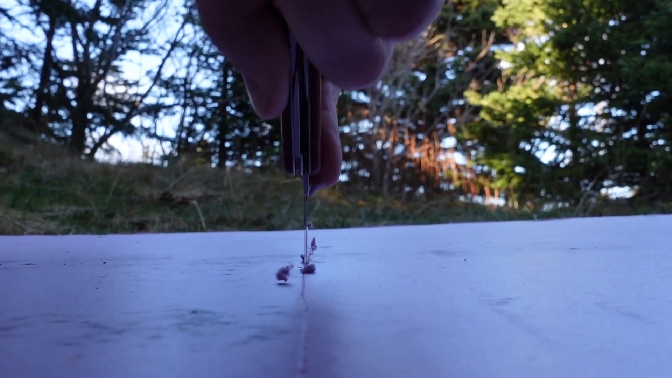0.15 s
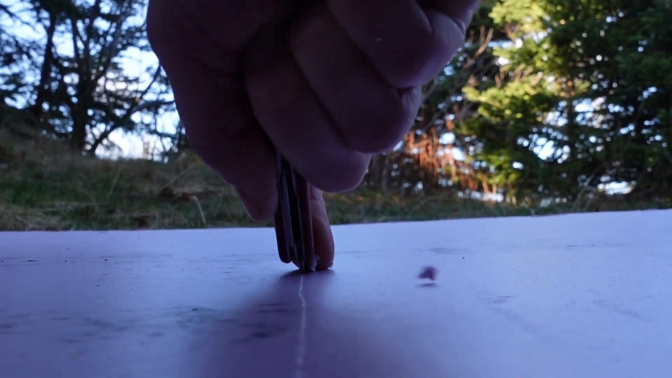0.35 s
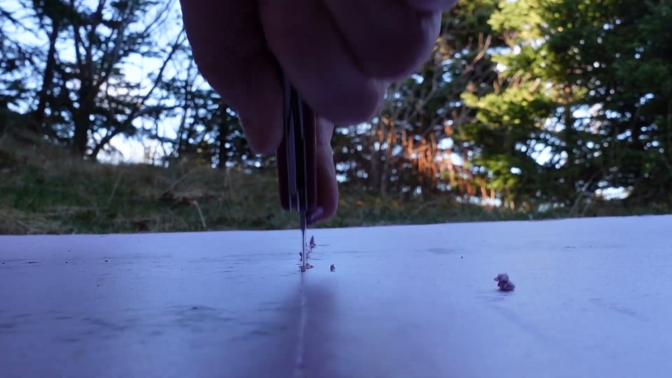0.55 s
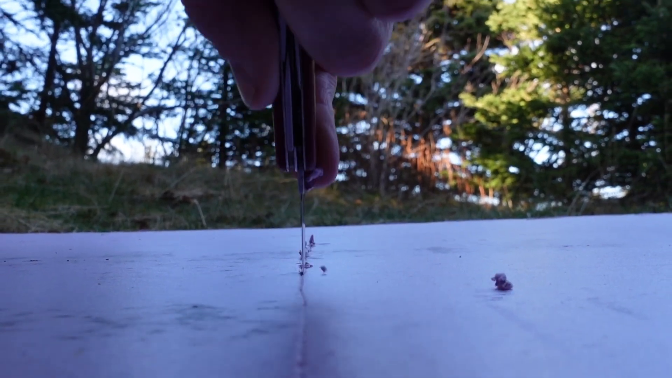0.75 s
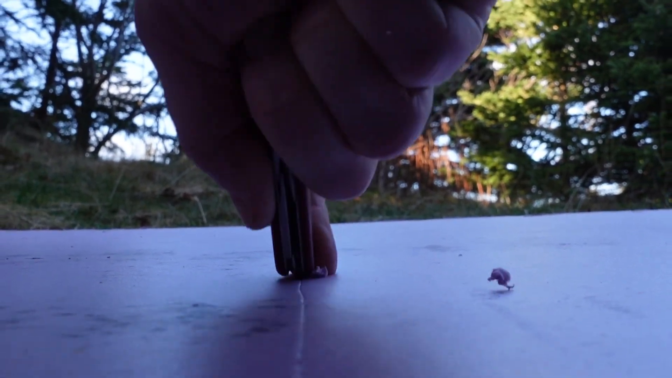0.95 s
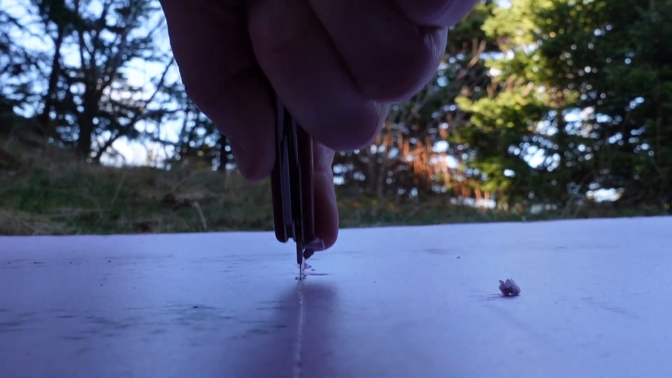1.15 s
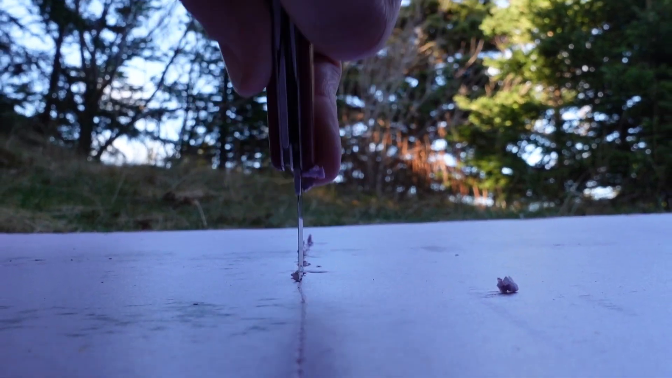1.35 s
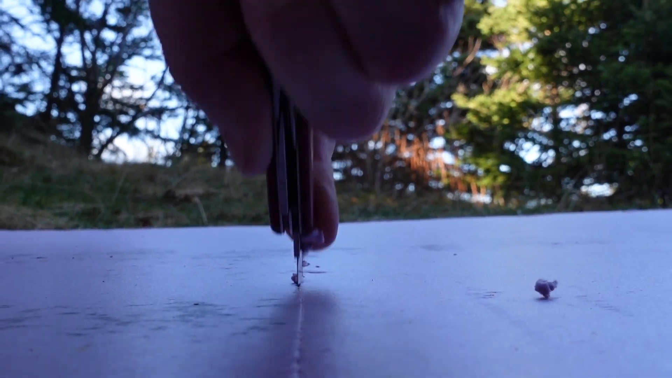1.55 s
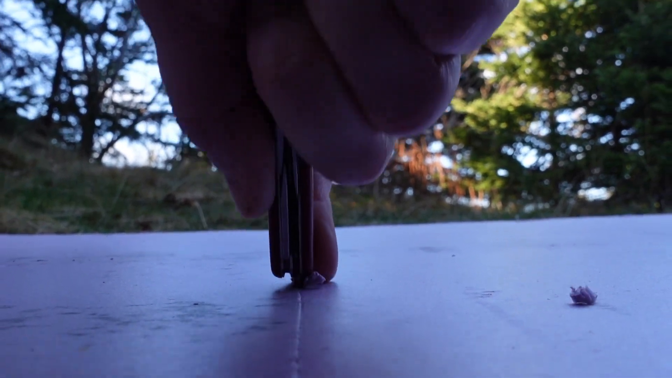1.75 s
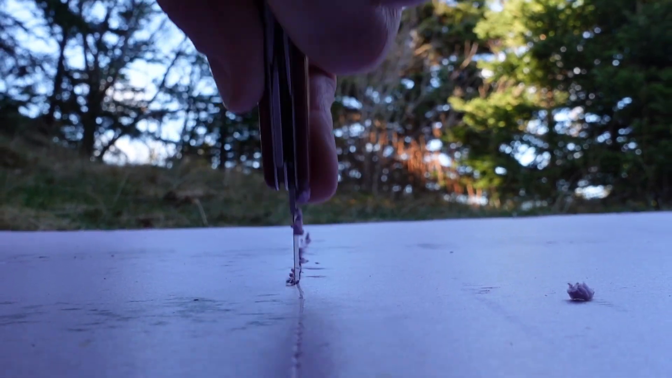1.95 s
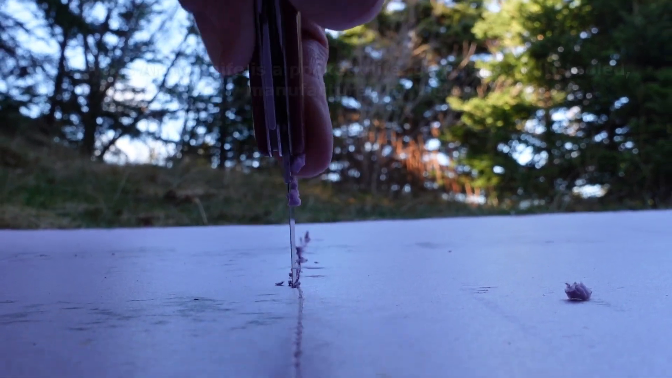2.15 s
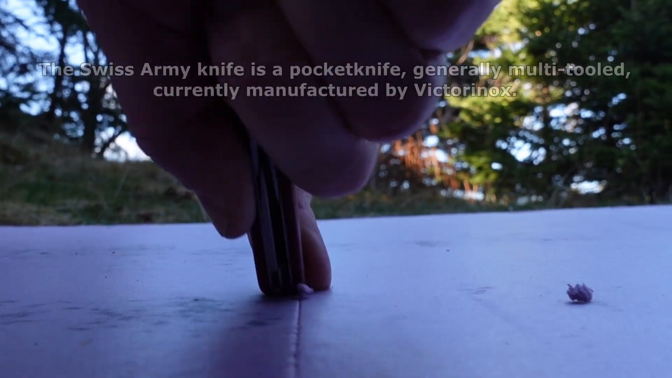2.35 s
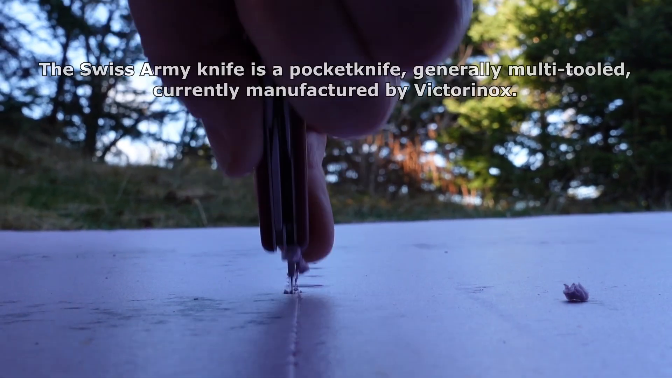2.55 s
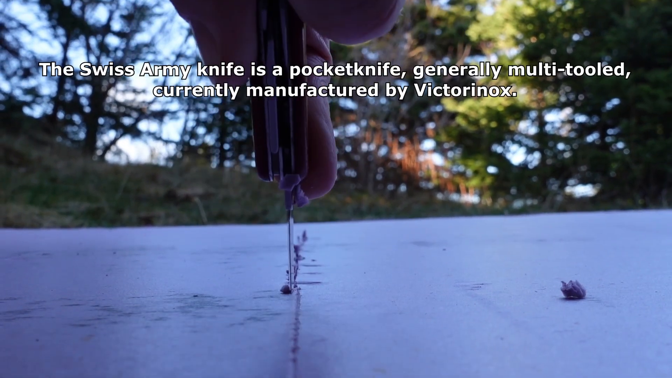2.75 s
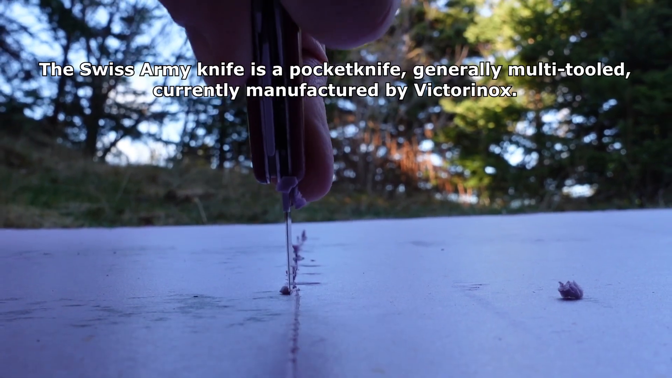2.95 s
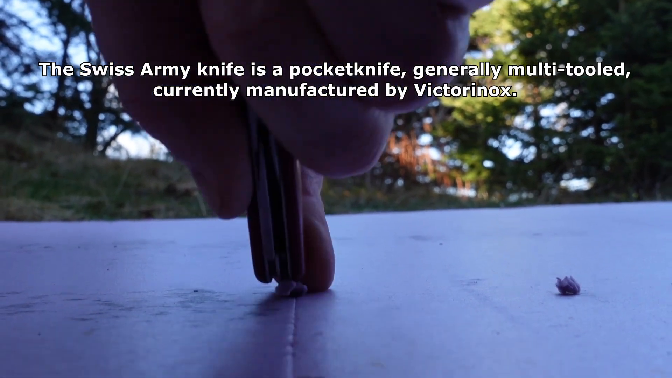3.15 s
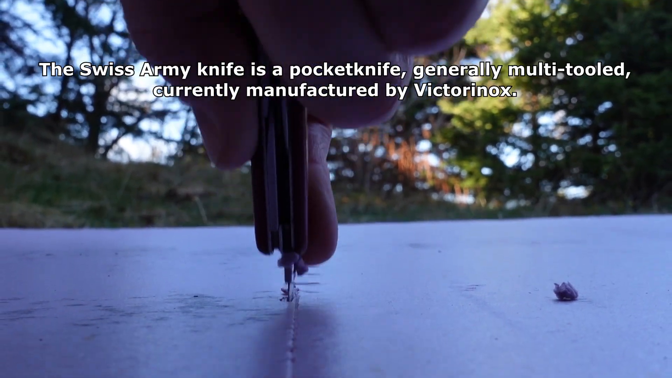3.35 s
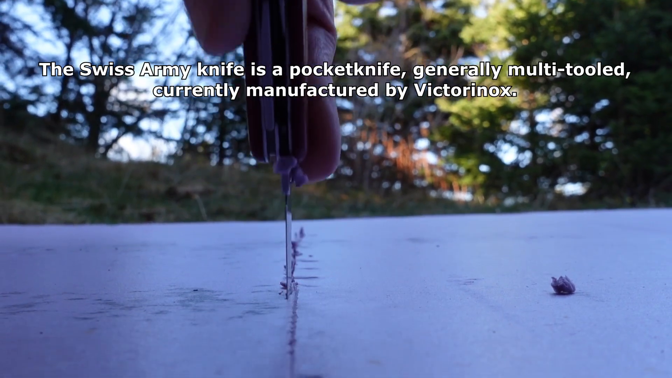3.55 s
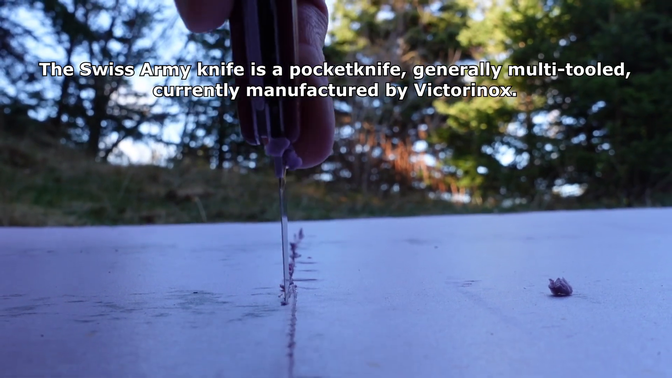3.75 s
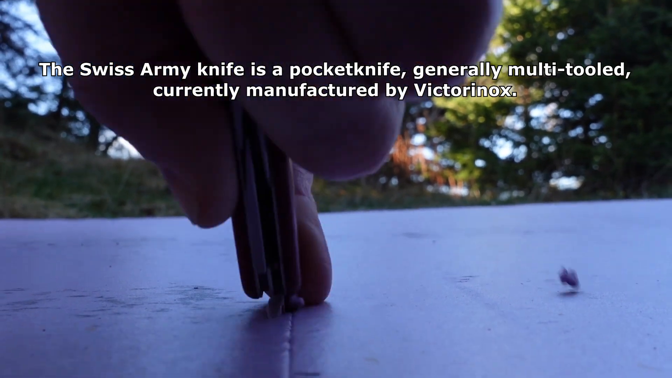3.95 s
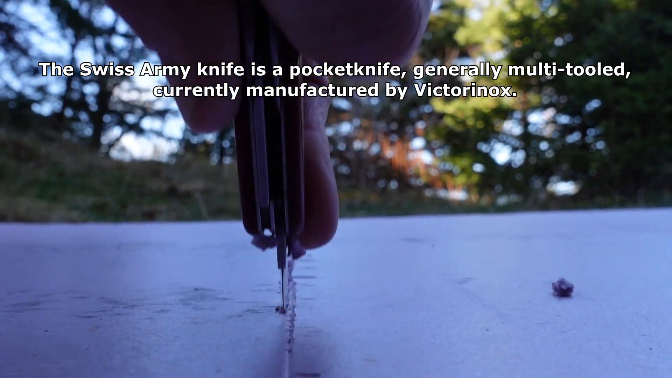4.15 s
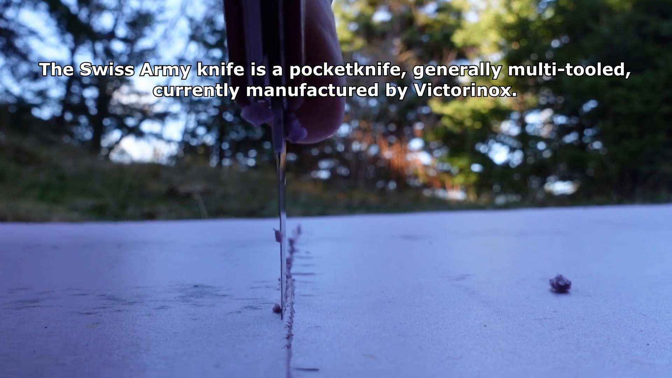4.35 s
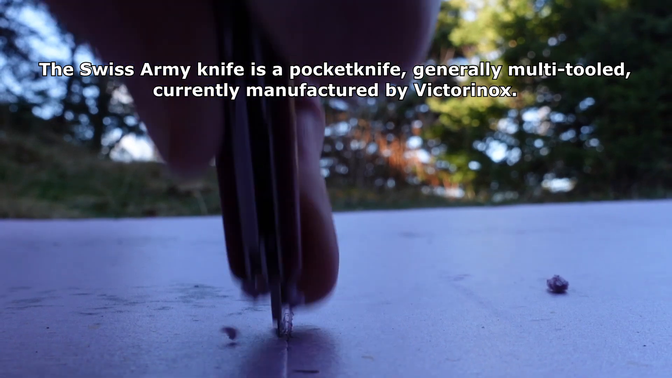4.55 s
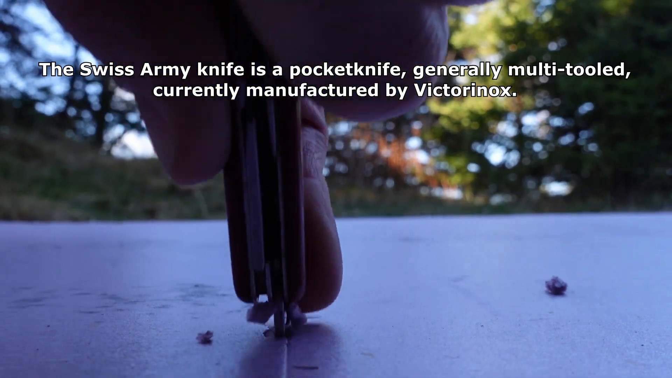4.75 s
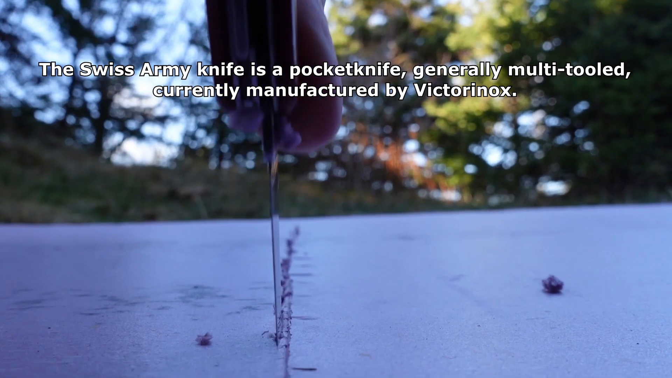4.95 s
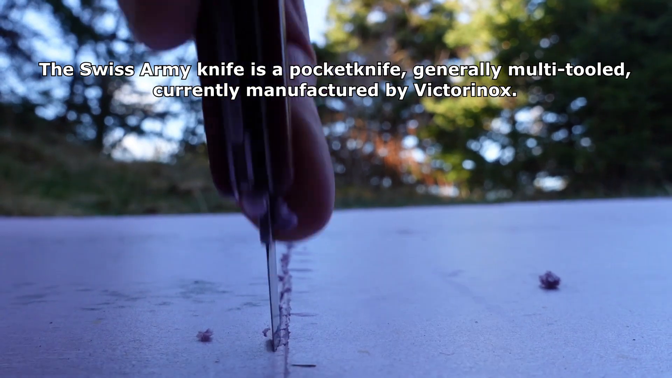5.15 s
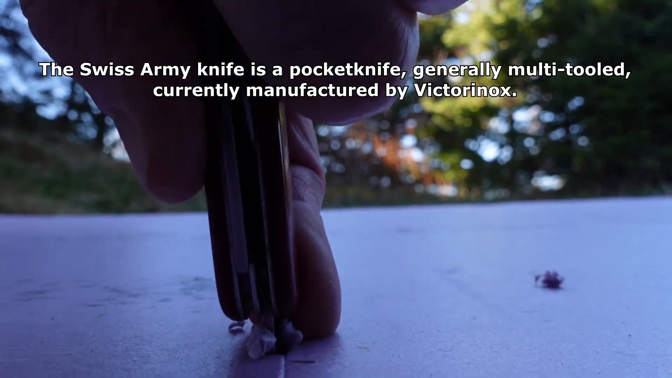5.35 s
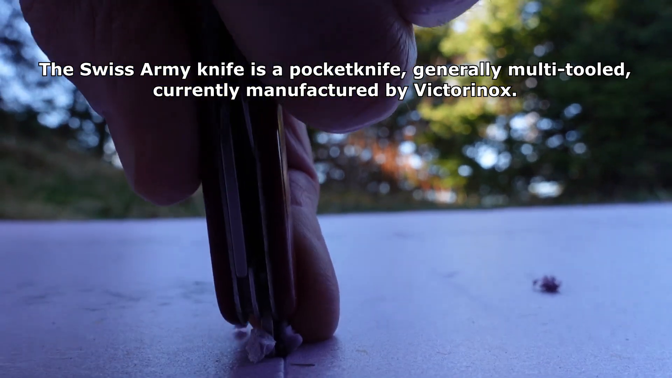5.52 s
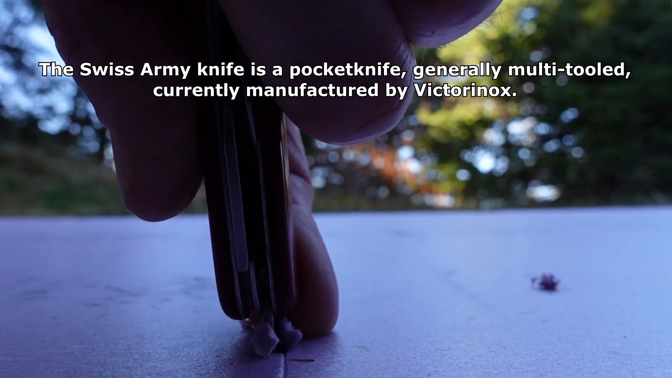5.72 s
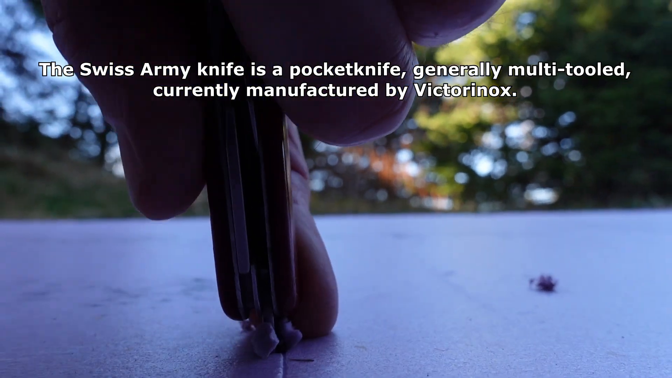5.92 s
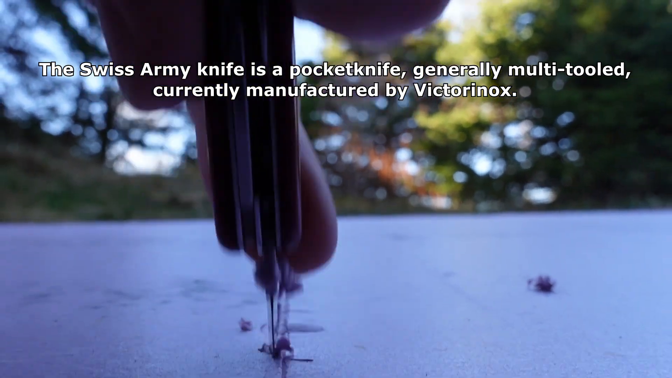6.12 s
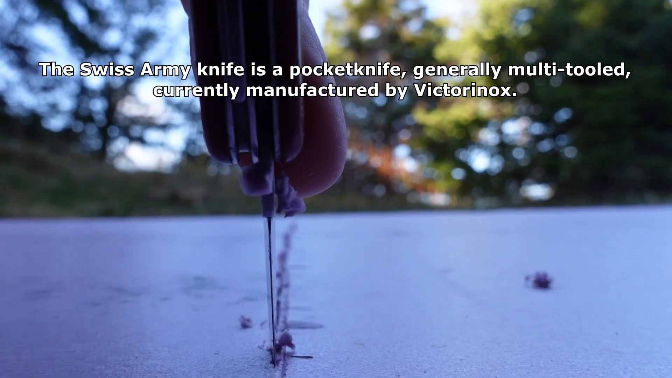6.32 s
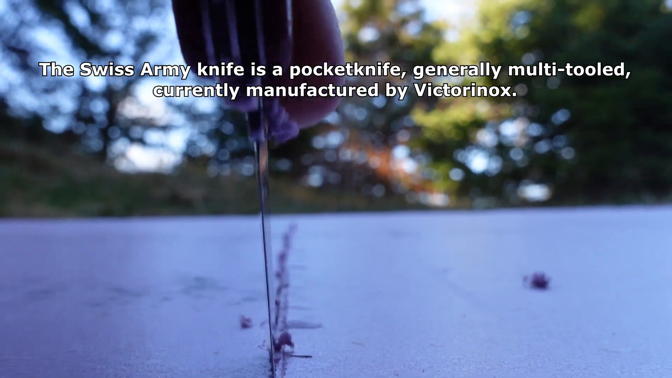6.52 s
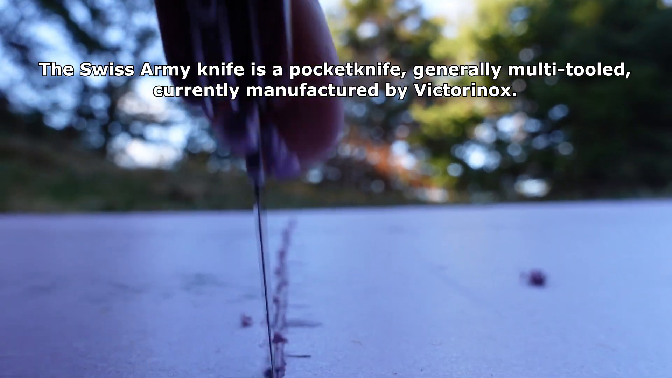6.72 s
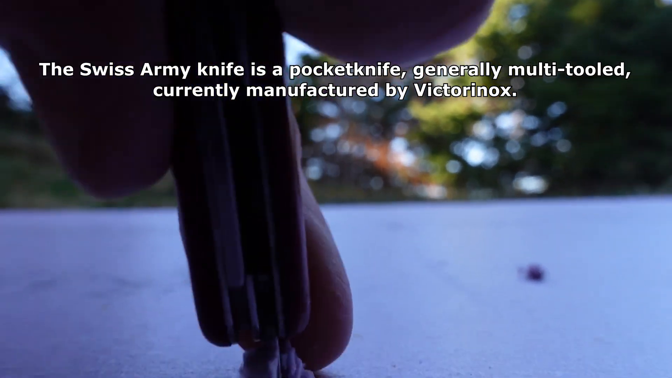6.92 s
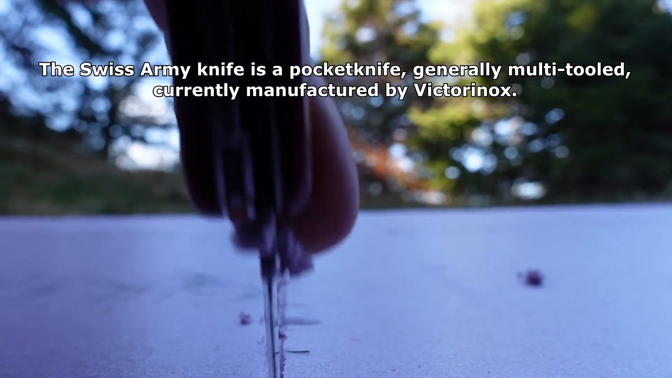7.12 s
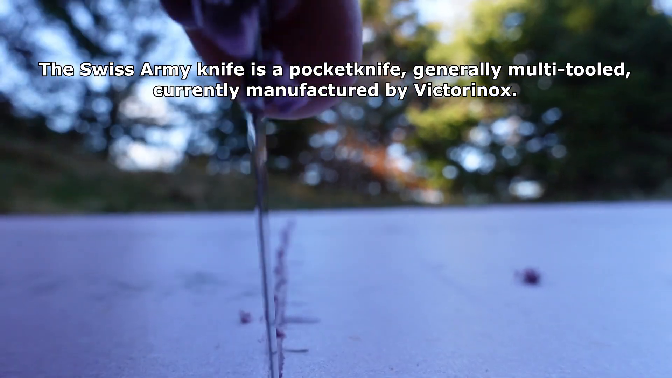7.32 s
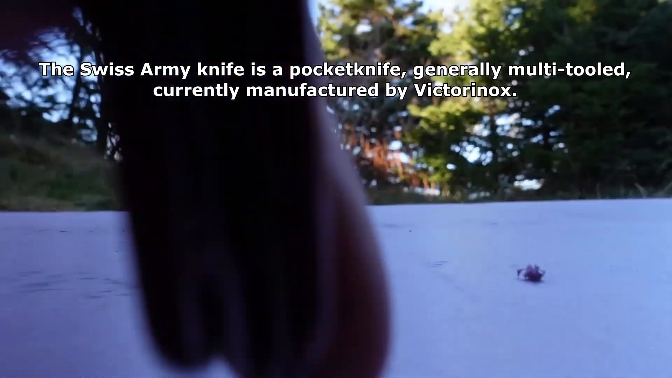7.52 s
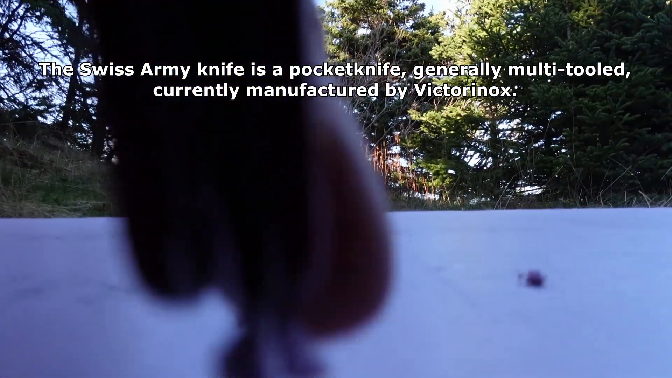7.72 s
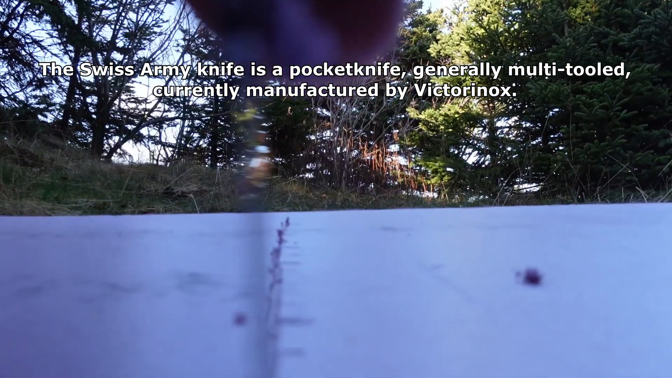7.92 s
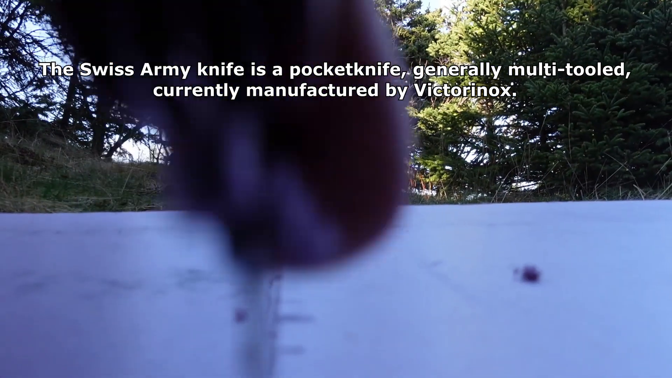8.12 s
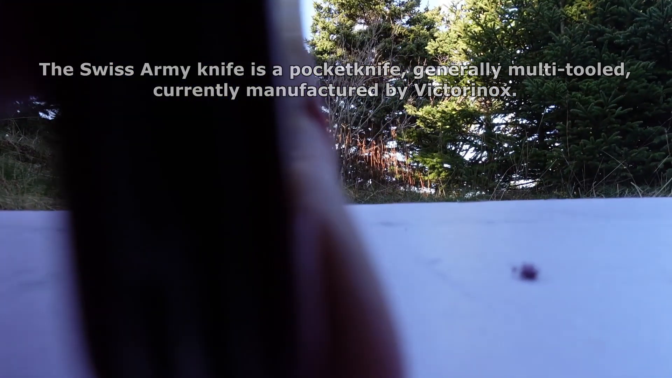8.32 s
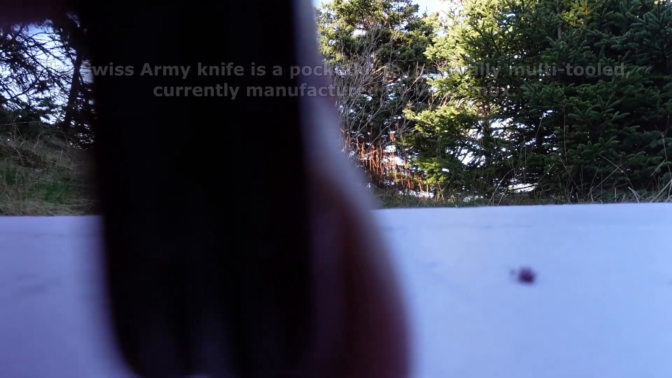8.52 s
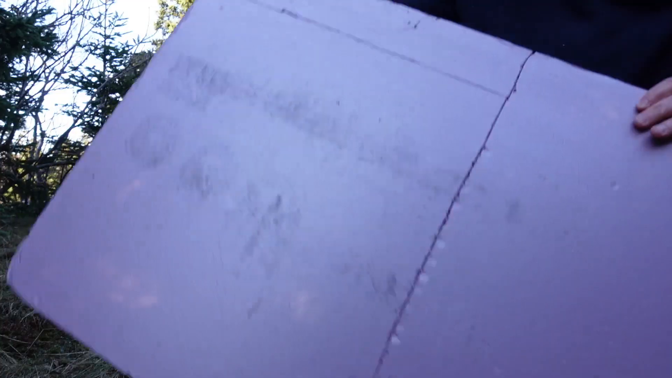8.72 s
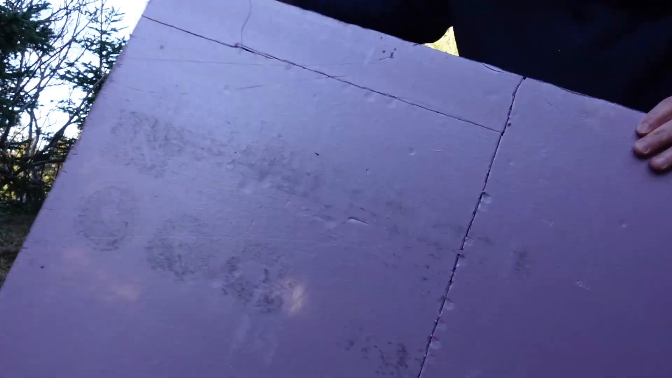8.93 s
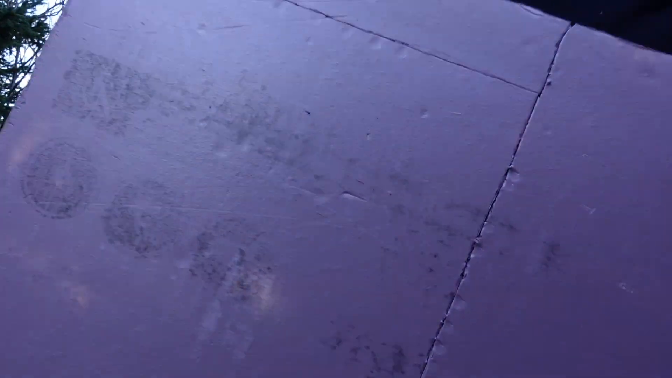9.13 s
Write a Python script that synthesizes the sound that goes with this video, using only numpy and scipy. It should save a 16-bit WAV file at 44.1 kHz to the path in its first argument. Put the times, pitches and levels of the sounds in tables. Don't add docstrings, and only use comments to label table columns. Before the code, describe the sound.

A small knife saws up and down through a thick rigid foam board outdoors, close to a stereo microphone. Coarse, crackling rasps alternate quickly, with brief stick-slip squeaks where the blade starts and stalls. The handle sometimes knocks the board dully and single foam cells snap. The cutting comes nearer, then the board is lifted with a hollow thump and hands slide over it.

```python
import sys
import numpy as np
from scipy import signal
from scipy.io import wavfile
from scipy.ndimage import uniform_filter1d

SR = 44100
rng = np.random.default_rng(int(sys.argv[2]) if len(sys.argv) > 2 else 0)


def convert_level_to_amplitude(level_db):
    exponent = np.asarray(level_db, float) / 20
    return 10 ** exponent


def master_out(mix):
    frames = np.transpose(np.atleast_2d(mix))
    ceiling = np.clip(frames, -1, 1)
    pcm = np.round(ceiling * 32767).astype(np.int16)
    wavfile.write(sys.argv[1], SR, pcm)


N = 409248

# [t/s, peak level/dB, pitch f/Hz, slow flexing level/dB]
KNOCK_EVENTS = [
    (0.983, -11, 270, -35),
    (1.697, -11, 240, -35),
    (2.403, -13, 186, -30.5),
    (4.018, -12.5, 268, -32),
    (4.679, -30, 427, -41.5),
    (5.33, -12, 389, -37),
    (5.718, -12.5, 229, -48),
    (8.862, -17, 489, -44),
    (8.955, -8.5, 472, -24.5),
]
# [t/s, share of the way to the microphone]
CUT_PATH = [
    (0, 0.053),
    (6, 0.96),
    (8.7, 1),
    (8.8, 1),
]


def evened(x):
    return x / np.sqrt(np.mean(x ** 2) + 1e-20)


def read(points, hz):
    f, value = np.transpose(points)
    return np.interp(np.log(hz + 1), np.log(f + 1), value)


def add(mix, s, sound):
    part = mix[round(s * SR):][:len(sound)]
    part += sound[:len(part)]


def coloured(x, db_of):
    hz = abs(np.fft.fftfreq(8192, 1 / SR))
    log_gain = np.log(convert_level_to_amplitude(np.maximum(db_of(hz), -90)))
    minimum_phase = np.exp(np.conj(signal.hilbert(log_gain)))
    taps = np.fft.ifft(minimum_phase).real[:4096]
    return signal.oaconvolve(x, taps)[:len(x)]


def wander(size):
    once = uniform_filter1d(rng.standard_normal(N), size)
    return evened(uniform_filter1d(once, size))


def above(hz, edge_hz, slope):
    return -10 * np.log10(1 + (edge_hz / (hz + 1)) ** slope)


def below(hz, edge_hz, slope):
    return -10 * np.log10(1 + (hz / (edge_hz + 1)) ** slope)


def drifting(x, hz_bins, frames, gain):
    z = signal.stft(x, nperseg=512)[2]
    fields = rng.standard_normal((2,) + z.shape)
    fields = uniform_filter1d(fields, hz_bins, 1)
    a, b = uniform_filter1d(fields, frames, 2)
    return signal.istft(z * gain(evened(a), evened(b)), nperseg=512)[1][:len(x)]


def air():
    # [f/Hz, level/dB]
    air_colour = [(24, -49), (40, -60), (412, 19), (8550, -20), (16000, -38)]
    hush = [evened(coloured(noise, lambda hz: read(air_colour, hz))) for noise in rng.standard_normal((2, N))]
    return convert_level_to_amplitude(-56) * np.array(hush)


def snaps():
    # [t/s, peak level/dB]
    snap_events = [(0.984, -7.5), (1.698, -16), (2.4725, -6.5), (3.195, -3), (4.019, -14), (5.325, -6.5),
                   (5.4455, -16.5), (5.5035, -15), (5.5305, -19.5), (5.5532, -19), (5.575, -27),
                   (5.616, -42), (5.6724, -13), (5.682, -5), (5.7024, -9), (5.7294, -14), (5.7426, -16),
                   (6.963, -4), (7.0216, -18), (7.716, -21), (8.773, -23), (8.864, -8), (9.108, -17)]
    creep = [(s, -24) for s in np.arange(5.452, 5.512, .0075)]
    ticks = list(snap_events) + creep
    out, t = np.zeros(N), np.arange(800) / SR
    bursts = rng.standard_normal((len(ticks), len(t))) * convert_level_to_amplitude(-60 * t / 0.0094)
    for (s, db), burst in zip(ticks, bursts):
        add(out, s, convert_level_to_amplitude(db + 3.0) * burst)
    return coloured(out, lambda hz: below(hz, 2560, 3.5) + above(hz, 300, 1.8))


def knocks():
    out, t = np.zeros(N), np.arange(16000) / SR
    rattle = rng.standard_normal((len(KNOCK_EVENTS), len(t)))
    ring_fade_s, flex_fade_s, flex_rise_s = 0.11, 0.52, 0.0085
    flexing = np.sin(2 * np.pi * 105 * t) * (1 + .5 * np.cos(2 * np.pi * 21 * t))
    flexing = flexing * convert_level_to_amplitude(-60 * t / flex_fade_s) * (1 - np.exp(-t / flex_rise_s))
    for (s, db, hz, flex_db), noise in zip(KNOCK_EVENTS, rattle):
        ring = np.sin(2 * np.pi * hz * t) + 0.97 * np.sin(2 * np.pi * 265 * t)
        thud = 8.0 * uniform_filter1d(noise, size=40)
        hit = convert_level_to_amplitude(db - 11.5 - 60 * t / ring_fade_s) * (ring + thud)
        add(out, s, hit + convert_level_to_amplitude(flex_db) * flexing)
    return out


def slip_runs():
    # [t/s, length t/s, slip rate halfway f/Hz, at the end f/Hz, level/dB]
    starts = [(0.215, 0.0086, 4280, 9300, -22), (0.5, 0.049, 2350, 6650, -27),
              (0.808, 0.02, 3290, 6400, -27), (1.077, 0.07, 2468, 7400, -27), (1.53, 0.02, 2490, 7750, -25),
              (1.801, 0.064, 2950, 10850, -30), (2.211, 0.028, 2660, 8000, -27.5),
              (2.506, 0.081, 3130, 8220, -27), (3.049, 0.04, 3380, 8800, -30),
              (3.857, 0.026, 4700, 7500, -32.5), (4.088, 0.065, 2285, 8400, -28.5),
              (4.511, 0.018, 2660, 10500, -28.5), (5.121, 0.047, 5070, 11800, -33),
              (6.058, 0.074, 2396, 7190, -29), (6.382, 0.065, 1785, 7860, -27),
              (6.752, 0.026, 2870, 10300, -34), (7.058, 0.081, 5080, 14900, -28),
              (7.433, 0.025, 2710, 12700, -33.5), (7.738, 0.05, 2600, 7860, -28),
              (8.563, 0.089, 2390, 7650, -27.5)]
    # [t/s, length t/s, slip rate at first f/Hz, halfway f/Hz, level/dB]
    stops = [(0.441, 0.013, 5530, 4230, -27.5), (0.765, 0.011, 7850, 4070, -31.5),
             (1.015, 0.018, 4700, 3950, -30), (1.47, 0.01, 7830, 5170, -32),
             (1.722, 0.042, 9930, 3880, -29.5), (2.158, 0.019, 15270, 10870, -27.5),
             (2.444, 0.021, 6840, 1910, -33), (2.83, 0.036, 11370, 8410, -27.5),
             (3.21, 0.024, 8480, 6060, -31.5), (3.761, 0.036, 10340, 2430, -27),
             (4.035, 0.015, 9500, 6350, -31.5), (4.445, 0.016, 13630, 9130, -27),
             (4.691, 0.013, 10280, 6330, -30), (5.069, 0.017, 13200, 8760, -26.5),
             (5.343, 0.068, 10300, 4010, -33.5), (6.352, 0.032, 8350, 4910, -31.5),
             (6.633, 0.046, 12780, 7550, -31), (6.965, 0.023, 14900, 12330, -26.5),
             (7.313, 0.043, 14740, 9750, -29.5), (7.625, 0.052, 10200, 6570, -29.5),
             (7.984, 0.049, 13880, 7500, -31), (8.367, 0.072, 14490, 6740, -29),
             (8.729, 0.039, 12580, 5150, -29.5)]
    # [t/s, length t/s, slip rate at first f/Hz, at the end f/Hz, level/dB]
    squeaks = [(0.199, 0.0069, 4840, 1390, -30.5), (0.566, 0.12, 9900, 10500, -36),
               (0.635, 0.042, 10900, 11300, -43), (0.628, 0.02, 7200, 5360, -30.5),
               (0.675, 0.01, 8800, 8750, -24), (0.747, 0.012, 15000, 12400, -29.5),
               (2.005, 0.02, 15200, 14400, -32), (2.897, 0.079, 647, 1500, -31),
               (3.176, 0.0099, 12800, 11200, -34), (3.273, 0.051, 907, 2408, -28.5),
               (3.306, 0.047, 2460, 7750, -29), (3.336, 0.075, 4270, 7460, -27),
               (3.412, 0.067, 5500, 9100, -40.5), (3.635, 0.041, 12160, 6870, -31),
               (3.673, 0.059, 7700, 12500, -31.5), (4.744, 0.039, 798, 1297, -29.5),
               (4.777, 0.059, 702, 2330, -28.5), (4.821, 0.02, 3690, 7200, -30.5),
               (4.823, 0.087, 6400, 8140, -34), (6.139, 0.04, 3600, 14900, -33),
               (6.488, 0.032, 10470, 4860, -31), (6.514, 0.032, 4160, 8600, -29.5),
               (8.072, 0.045, 2360, 2165, -34.5), (8.097, 0.048, 4400, 13800, -33)]
    grip_hz, stall_hz = 953, 712.4
    runs = [(s, d, grip_hz, mid, top, db) for s, d, mid, top, db in starts]
    runs += [(s, d, top, mid, stall_hz, db) for s, d, top, mid, db in stops]
    runs += [(s, d, a, np.sqrt(a * b), b, db) for s, d, a, b, db in squeaks]
    return sorted(runs)


def squeals():
    flutter_db, overtone_db, beside_db = -0.5, -7, -4
    jitter, spread, grip_pull = .06, .22, 0.067
    out = np.zeros(N)
    spots = [(offset, wander(size=24), wander(size=40), wander(size=300)) for offset in (-1, 0, 1)]
    for s, length, a_hz, mid_hz, b_hz, db in slip_runs():
        u = np.linspace(0, 1, round(length * SR))
        at = slice(round(s * SR), round(s * SR) + len(u))
        bend = np.sqrt(a_hz) * (1 - u) * (1 - 2 * u)
        bend += 4 * np.sqrt(mid_hz) * u * (1 - u)
        bend += np.sqrt(b_hz) * u * (2 * u - 1)
        rate_hz = bend ** 2
        loose = np.minimum(1, (2600 / rate_hz) ** 1.3)
        quick = abs(np.log(b_hz / a_hz)) / length
        loose = np.maximum(loose, np.minimum(.8, quick / 90))
        edges = np.minimum(1, np.minimum(u * a_hz / 9, (1 - u) * b_hz / 2.44) * length)
        for offset, drift, flutter, grip in spots:
            unsteady = jitter * (1 + 2 * abs(offset)) * drift[at]
            hz = rate_hz * (1 + loose * (grip_pull * grip[at] + unsteady + spread * offset))
            turns = 2 * np.pi * np.cumsum(hz) / SR
            slips = 0
            for k in range(1, 7):
                audible = k * hz < 16500
                slips = slips + convert_level_to_amplitude(overtone_db * np.log2(k)) * np.cos(k * turns) * audible
            level_db = db + 7 + flutter_db * flutter[at] + abs(offset) * (beside_db + 5.58 * grip[at])
            add(out, s, convert_level_to_amplitude(level_db) * edges * slips)
    return coloured(out, lambda hz: below(hz, 10560, 4.0))


def stroke_gains(t):
    # [start t/s, end t/s, early pressure level/dB, late level/dB, weight on the board level/dB]
    pushes = [(.213, .457, -25.5, -23.5, -0.5), (.8, 1.032, -25, -25, -0.5), (1.533, 1.765, -24, -27, 0.5),
              (2.213, 2.466, -23.5, -24, -1.5), (2.885, 2.985, -22.5, -29, -4), (3.047, 3.235, -25, -28, 0),
              (3.855, 4.051, -25, -28, -1), (4.505, 4.706, -27, -26, 0.5), (5.125, 5.41, -29.5, -33, 1),
              (5.67, 5.96, -28.5, -33, -3.5), (6.74, 6.99, -27, -32.5, -0.5),
              (7.424, 7.683, -33, -28.5, 0.5), (8.07, 8.447, -32.5, -33, -0.5)]
    pulls = [(-.03, .195, -25, -25.5, -0.5), (.5, .78, -30.5, -26, 0.5), (1.08, 1.484, -27.5, -24.5, -1),
             (1.8, 2.173, -23, -26.5, -2), (2.51, 2.868, -23.5, -25, -2), (3.262, 3.805, -28.5, -30, -1),
             (4.088, 4.458, -29.5, -28.5, -0.5), (4.74, 5.088, -30, -35.5, 3.5), (6.05, 6.378, -31, -33, 3),
             (6.385, 6.68, -34, -40.5, 0.5), (7.03, 7.357, -32.5, -35.5, 1), (7.715, 8.03, -35, -35.5, 0),
             (8.53, 8.765, -35.5, -30.5, -2)]
    slides = [
        (5.435, 5.56, -48, -61, 6.5),
        (5.56, 5.66, -79, -86, 12),
        (5.945, 6.07, -39, -24, -2),
        (7.712, 7.745, -47.5, -39.5, 10),
        (8.51, 8.575, -50.5, -36, 9),
        (8.772, 8.86, -22.5, -27, -4),
        (8.86, 9.0, -21, -34, -2.5),
        (9.0, 9.16, -42, -35.5, 3),
        (9.16, 9.4, -24, -20, -5),
    ]
    # [rise t/s, fall t/s, (boom, crunch, hiss, dust) about the pressure level/dB,
    # extra weight in mid stroke level/dB]
    push = (0.055, 0.014, (-5.5, -3.5, 2, -12.5), 3.58)
    pull = (0.044, 0.0047, (-6.5, -5, -0.5, -11), 0.13)
    slide = (0.0091, 0.013, (-6, -7.5, 2, -11.5), 0.23)
    weight_share = (1.74, 1.4, 0.24, 1.24)
    near_db = (-1.5, -0.5, -6, 5.5)
    rest_db = (-83.5, -61, -60, -76)
    ramp_share = (0.43, 0.64, 1, 0.99)
    ramp_db, rise_bend, fall_lead = 18, 1.3, 0.69
    near = np.outer(near_db, np.interp(t, *np.transpose(CUT_PATH)))
    out = convert_level_to_amplitude(rest_db)[:, None] * np.ones(len(t))
    for rows, (rise_s, fall_s, band_db, swell_db) in ((pushes, push), (pulls, pull), (slides, slide)):
        for start, end, early_db, late_db, weight_db in rows:
            rise = np.maximum(1 - (t - start) / rise_s, 0) ** rise_bend
            fall = np.maximum((t - end) / fall_s + fall_lead, 0) ** 2
            through = np.clip((t - start) / (end - start), 0, 1)
            swell = swell_db * np.sin(np.pi * through ** 1.15)
            lean = np.interp(t, (start + rise_s, end), (early_db, late_db))
            lean = lean - ramp_db * np.outer(ramp_share, rise + fall)
            weight = np.outer(weight_share, weight_db + swell)
            out = out + convert_level_to_amplitude(lean + near + np.array(band_db)[:, None] + weight)
    return out


def slip_focus(t):
    band_hz = (350, 1500, 4600, 11000)
    focus_db, below_db_per_oct, above_db_per_oct = 10.5, 13, 3.5
    faint_db, full_db = -43, -13
    thin_hz, thin_db_per_oct = 7500, 10
    start_lead_s, stall_lead_s = 0.084, 0.0026
    focus = np.zeros((len(band_hz), len(t)))
    for s, length, *hz, db in slip_runs()[::-1]:
        lead = start_lead_s if hz[0] < hz[2] else stall_lead_s
        on = (t >= s - lead) & (t < s + length)
        octave = np.interp(t[on], s + length * np.array([0, .5, 1]), np.log2(hz))
        db = db - thin_db_per_oct * np.maximum(octave - np.log2(thin_hz), 0)
        under = octave - np.log2(band_hz)[:, None]
        away_db = np.maximum(below_db_per_oct * np.minimum(under, 3.5), -above_db_per_oct * under)
        strength = np.clip((db - faint_db) / (full_db - faint_db), 0, 1)
        onset = np.minimum((t[on] - s) / lead + 1, 1)
        focus[:, on] = strength * onset * (focus_db - away_db)
    return uniform_filter1d(focus, size=9, axis=1)


def pressure():
    t = np.arange(0, N + 64, 64) / SR
    bands = stroke_gains(t) * convert_level_to_amplitude(slip_focus(t))
    return [np.interp(np.arange(N) / SR, t, band) for band in bands]


def cells(per_s, spread_db, clump_db):
    uneven_db = spread_db * np.minimum(rng.exponential(1, N), 4)
    size = convert_level_to_amplitude(uneven_db + clump_db * wander(size=90))
    return size * (rng.random(N) < per_s / SR) * rng.standard_normal(N)


def rasp():
    # [f/Hz, level/dB]
    rasp_colour = [(50, -15), (219, 3.5), (1110, -1), (2650, -2.5), (4970, 0), (10000, -9.5),
                   (14800, -17.5), (16300, -23)]
    near, fine = cells(3500, 0.55, 0.38), cells(14000, 0.5, 2.0)
    shared = 0.6 * evened(near) + 0.8 * evened(fine)
    bands = [(near, 60, 900), (near, 900, 2500), (shared, 2500, 8500), (shared, 8500, 17000)]  # from, to Hz
    out = 0
    for gain, (bursts, lo_hz, hi_hz) in zip(pressure(), bands):
        band = coloured(bursts, lambda hz: read(rasp_colour, hz) + above(hz, lo_hz, 9.3)
                        + below(hz, hi_hz, 12.24))
        out = out + gain * evened(band)
    halt_db = np.zeros(N)
    for s, *_ in KNOCK_EVENTS[:-2]:
        add(halt_db, s + 0.0011, -14 * np.hanning(900))
    return drifting(out * convert_level_to_amplitude(halt_db), hz_bins=5, frames=36, gain=lambda a, b: convert_level_to_amplitude(2.3 * a))


def board(x):
    # [f/Hz, width f/Hz, level/dB with the cut far away, level/dB with it close]
    resonances = [(150, 240, 4, -4), (265, 50, 3.5, -5), (346, 230, -3, 5), (573, 240, 4.5, 5.5),
                  (770, 140, -3.5, -0.5), (1170, 210, 3.5, -4), (1500, 395, 2, 7), (2120, 130, 1.5, 3.5),
                  (4850, 980, 1.5, 1), (7650, 4000, -3, 3.5)]

    def resonance_db(hz, column):
        return sum(m[column] / (1 + (2 * (hz - m[0]) / m[1]) ** 2) for m in resonances)

    far = coloured(x, lambda hz: resonance_db(hz, 2))
    close = coloured(x, lambda hz: resonance_db(hz, 3))
    share = np.clip(np.interp(np.arange(N) / SR, *np.transpose(CUT_PATH)), 0, 1)
    x = (1 - share) * far + share * close
    t = np.arange(3000) / SR
    tail = rng.standard_normal(len(t)) * convert_level_to_amplitude(-60 * t / 0.044)
    tail = coloured(tail, lambda hz: below(hz, 1950, 7.9))
    return x + convert_level_to_amplitude(-19) * signal.oaconvolve(x, tail / np.linalg.norm(tail))[:N]


def stereo(mid):
    # [f/Hz, level/dB against the middle]
    width = [(60, -104), (240, -23), (950, -18.5), (3770, -9.5), (15000, -8.5)]
    scattered = drifting(mid, hz_bins=3, frames=6, gain=lambda a, b: (a + 1j * b) / np.sqrt(2))
    side = coloured(scattered, lambda hz: read(width, hz))
    return np.array([1.06 * mid + side, mid - side])


def scene():
    return air() + stereo(board(snaps() + knocks() + squeals() + rasp()))


def roll_off(x):
    return signal.sosfilt(signal.butter(12, 16440, fs=SR, output="sos"), x)


def record(dry):
    thin = signal.sosfilt(signal.butter(2, 95, "high", fs=SR, output="sos"), dry)
    rounded = np.tanh(thin)
    band_limit = signal.firwin(255, 16200, window=("kaiser", 9), fs=SR)
    return roll_off(signal.oaconvolve(rounded, band_limit[None], "same"))


dry = scene()
out = record(dry)
master_out(out)
```